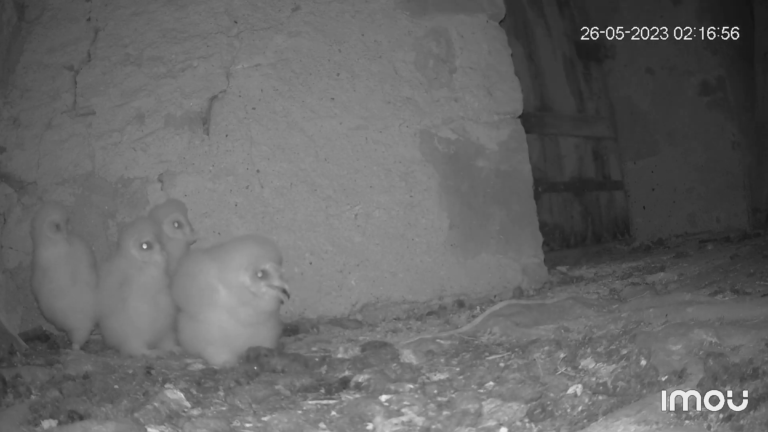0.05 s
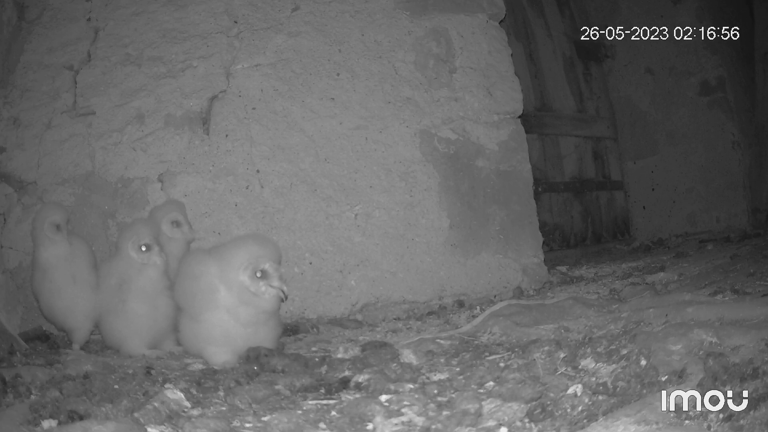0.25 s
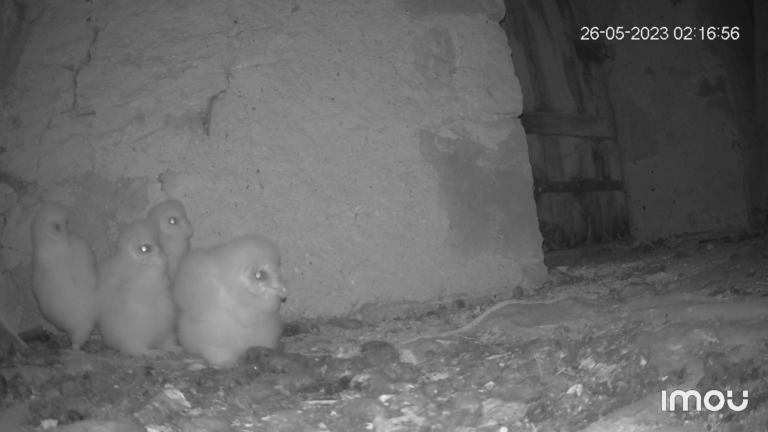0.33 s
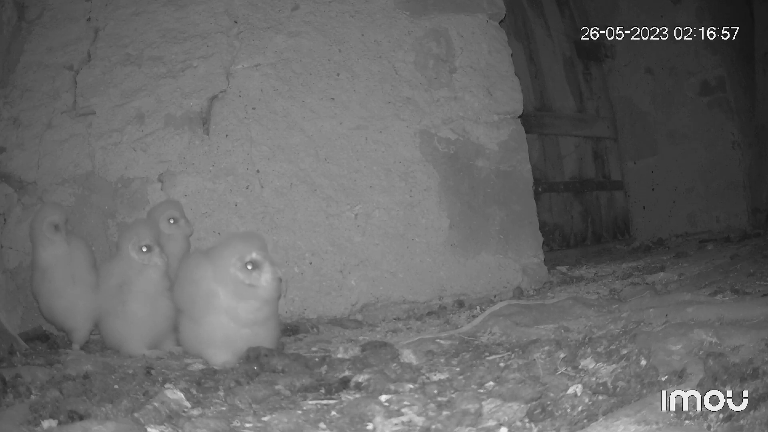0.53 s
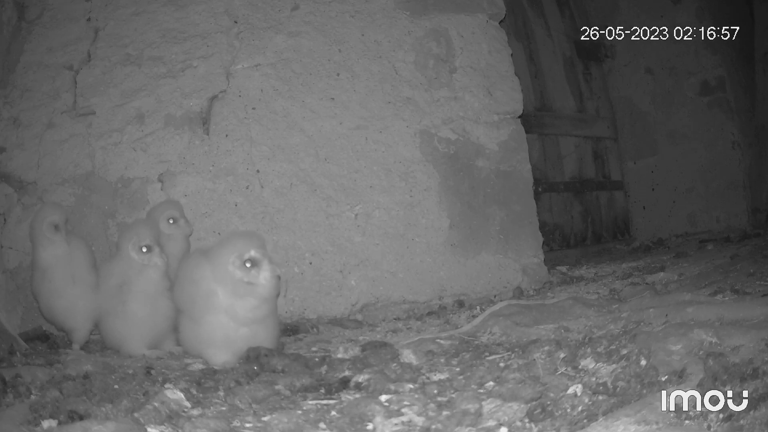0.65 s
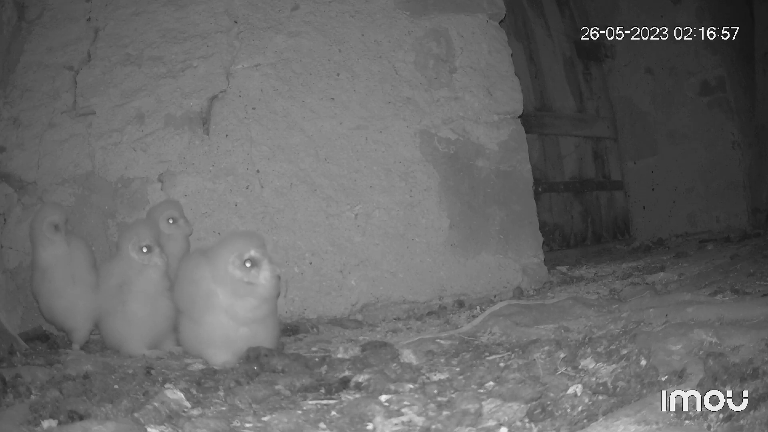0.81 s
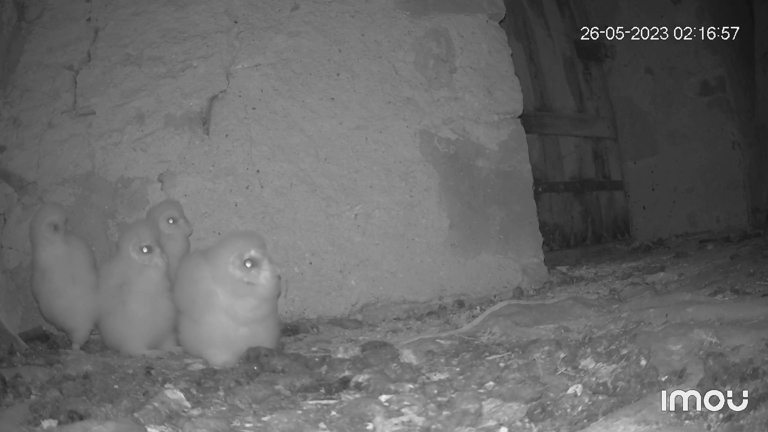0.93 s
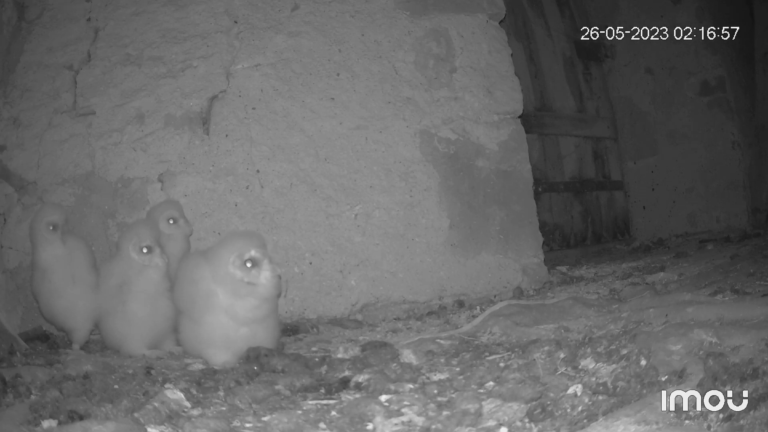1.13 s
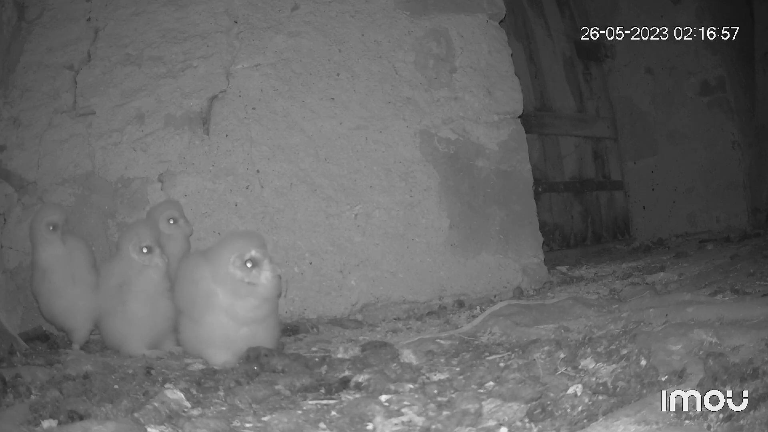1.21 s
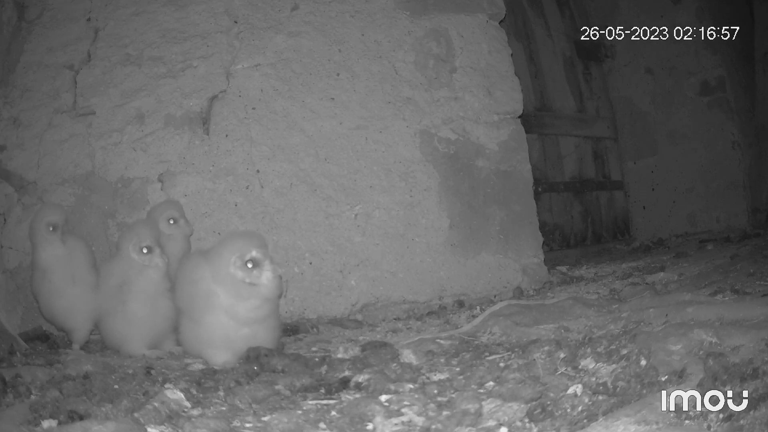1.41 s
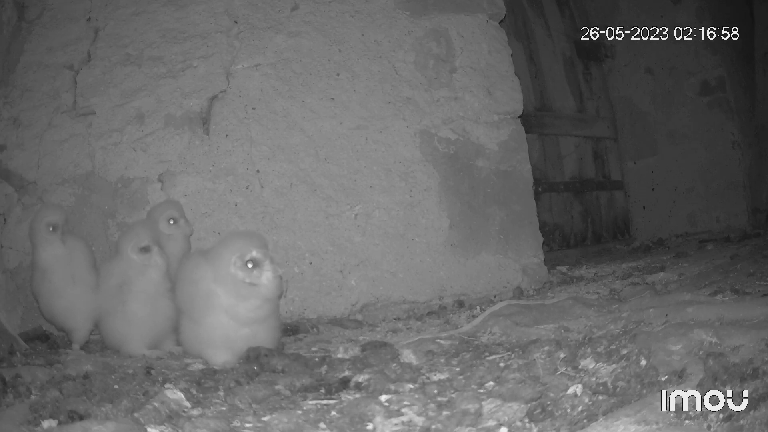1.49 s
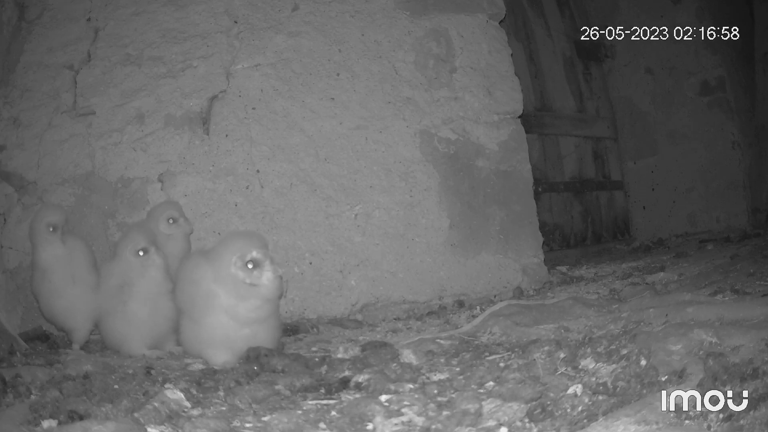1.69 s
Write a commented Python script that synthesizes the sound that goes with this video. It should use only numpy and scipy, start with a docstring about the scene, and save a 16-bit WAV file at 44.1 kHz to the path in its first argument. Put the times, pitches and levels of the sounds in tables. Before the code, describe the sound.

One short, raspy owl chick hiss, then a faint dropping squeak. Deep handling thumps begin during the call, ease off, and return more softly later, with barely audible nest rustles and very quiet air.

```python
"""Owl chick hissing in a stone nest chamber

A barn owl chick gives one harsh, rasping hiss, then a tiny squeak that falls in pitch.
The hiss is noise in narrow resonances of bird and chamber, which glide and dull as the beak closes.
Handling of the microphone adds two bouts of low, uneven rumble (noise in three bands) and dull bumps (pulses).
Short noise puffs make faint nest rustles; coloured noise makes the very quiet air, louder until the call ends."""
import sys
import numpy as np
from scipy import signal
from scipy.fft import rfft, irfft, next_fast_len
from scipy.io import wavfile
from scipy.ndimage import uniform_filter1d, map_coordinates

SR = 44100
rng = np.random.default_rng(int(sys.argv[2]) if len(sys.argv) > 2 else 0)


def log_audio(samples):
    """Write samples as a 16-bit WAV file to the path given in sys.argv[1]."""
    # one column per channel
    frames = np.atleast_2d(samples).T
    # limit to full scale, then quantise
    limited = np.clip(frames, -1, 1)
    pcm = np.round(limited * 32767).astype(np.int16)
    wavfile.write(sys.argv[1], SR, pcm)


N = 77175  # 1.75 s


def amp(db):
    """Decibels to gain."""
    return 10 ** (np.asarray(db) / 20)


def unit(x):
    """Scale to rms 1."""
    return x / np.sqrt(np.mean(x ** 2) + 1e-20)


def curve(rows):
    """Second column of a table against its first (s), one value per sample; the ends are held."""
    times, values = np.transpose(rows)
    return np.interp(np.arange(N) / SR, times, values)


def faded_curve(rows, outside):
    """Like curve, but with the value outside before the first row and after the last."""
    times, values = np.transpose(rows)
    return np.interp(np.arange(N) / SR, times, values, left=outside, right=outside)


def wobble(rate):
    """A smooth random curve, rate knots a second."""
    knots = rng.standard_normal(N // 8)
    return map_coordinates(knots, [np.arange(N) * rate / SR], mode="wrap")


def filtered(x, response):
    """x with its spectrum multiplied by a response of frequency in Hz."""
    padded = next_fast_len(N + 8192)
    hz = np.fft.rfftfreq(padded, 1 / SR)
    return irfft(rfft(x, padded) * response(hz), padded)[:N]


def noise(colour):
    """Noise of rms 1 with a (Hz, relative dB) colour, joined up along log frequency."""
    hz, db = np.transpose(colour)
    response = lambda f: amp(np.interp(np.log(f + 1), np.log(hz + 1), db))
    return unit(filtered(rng.standard_normal(N), response))


def smoothed(x, size):
    """Running mean over size samples, taken twice."""
    return uniform_filter1d(uniform_filter1d(x, size), size)


def steadied(x, size):
    """Noise with its chance swells over size samples evened out, to rms near 1."""
    power = smoothed(x ** 2, size)
    return x / np.sqrt(np.abs(power) + 1e-9)


def rounded(db, size):
    """Gain of a level curve with its corners rounded over size samples."""
    return amp(smoothed(db, size))


def hiss():
    """Turbulent air through the closing beak, roughened by fast random changes of level."""
    # effort of the breath: time_s, level_db
    effort = [(0.04, -94), (0.07, -71), (0.112, -57), (0.132, -43.5), (0.186, -37), (0.274, -41),
              (0.338, -37.5), (0.456, -46.5), (0.486, -57), (0.53, -100)]
    # shape of the beak: time_s, closing (0 open, 1 half closed, 2 closing)
    beak = [(.24, 0.11), (.3, 0.8), (.365, 0.82), (.405, 2)]
    rasp_per_s, rasp_db, patchy_db = 550, 1.5, 2
    air = steadied(patchy(throat(curve(beak)), patchy_db), size=700)
    rasp = unit(amp(rasp_db * wobble(rasp_per_s)))
    return air * rasp * amp(faded_curve(effort, outside=-120))


def throat(beak):
    """Resonances that glide and change balance as the beak closes, over a broad rush of air."""
    # bird and chamber: centre_hz, width_hz, glide_hz over the whole closing, then relative level
    # open_db, half_closed_db, closing_db (each before the square root of the width is applied)
    resonances = [(1170, 63, 36, -38, -26, -29), (1380, 75, 59.5, -31, -19, -21.5),
                  (1780, 62, -20, -25.5, -23.5, -26), (2155, 66, 32.5, -10, -16, -12.5),
                  (2555, 42, -1.5, -16.5, -6, -27), (2760, 42, 120.5, -13.5, -20.5, -5.5),
                  (3093, 67, 19.5, -7.5, -4, -5), (3287, 50, 28.5, -5.5, -12.5, 2.5),
                  (3416, 53, 50, -1, 3, 4), (3630, 15, 0.5, -0.5, -0.5, -14),
                  (3943, 62, -59, -0.5, -2, -2.5), (4190, 80, -5.5, -3.5, -7, -12),
                  (4470, 130, 3.5, -12.5, -14, -4.5), (4420, 25, -31, -3.5, -7, -11),
                  (4927, 41, -46.5, -2.5, -4, -12), (5290, 90, -5, -13, -17.5, -18.5),
                  (5442, 35, 70, -3.5, -11.5, -13.5), (5878, 70, -110, -2.5, -6.5, -7.5),
                  (6336, 46, -1, -10, -9.5, -14.5), (6600, 75, -28, -10, -13.5, -21),
                  (6970, 39, 5, -8, -14, -9.5), (7203, 46, -61.5, -9.5, -16, -27.5)]
    # broad rush under the resonances: frequency_hz, relative_db
    rush = [(500, -39.5), (1000, -34), (1900, -32.5), (2750, -29), (3250, -3), (4300, 2), (5100, -3.5),
            (6200, -6.5), (7200, -19.5)]
    rush_db = -12  # relative to the resonances together
    wander_hz, wander_per_s = 32, 25  # unsteady pitch of each resonance
    swell_db, swell_per_s = 2.5, 36  # each resonance comes and goes
    ringing = np.zeros(N)
    for hz, width, glide, *dbs in resonances:
        centre = hz + glide * beak / 2 + wander_hz * wobble(wander_per_s)
        swell = swell_db * wobble(swell_per_s)
        gain = amp(np.interp(beak, range(3), dbs) + swell)
        ringing += resonance(centre, width) * np.sqrt(width) * gain
    return unit(unit(ringing) + amp(rush_db) * noise(rush))


def resonance(hz, width):
    """Air in one resonance: a narrow band of noise whose centre follows the curve hz."""
    skirt = 2.1  # steepness of the flanks
    response = lambda f: (1 + ((f - hz[0]) / width) ** 2 / skirt) ** -skirt
    band = steadied(filtered(rng.standard_normal(N), response), size=1100)
    # the band starts at hz[0]; turning its analytic signal shifts it along the curve
    turn = 2 * np.pi * np.cumsum(hz - hz[0]) / SR
    return np.real(signal.hilbert(band) * np.exp(1j * turn))


def patchy(x, db):
    """Turbulence: the level swells at random in patches of time and frequency."""
    spectra = signal.stft(x, nperseg=512)[2]
    field = rng.standard_normal(spectra.shape)
    for axis in (0, 1):
        field = uniform_filter1d(field, size=3, axis=axis)
    return signal.istft(spectra * amp(db * unit(field)), nperseg=512)[1][:N]


def squeak():
    """Short, overlapping tone blips with jittered pitch, stepping down as the hiss stops."""
    # blips: start_s, pitch_hz, gain_db, rise_scale_s (the peak comes 1.38 scales after the start)
    blips = [(0.495, 1810, -78, 0.013), (0.5187, 1366, -58, 0.0049), (0.529, 1151, -54, 0.0044)]
    jitter, jitter_per_s = 0.035, 900  # jitter as a fraction of the pitch
    octave_db = -32  # overtone relative to the fundamental
    out = np.zeros(N)
    for start, hz, db, rise in blips:
        u = np.maximum(np.arange(N) / SR - start, 0) / rise
        phase = 2 * np.pi * np.cumsum(hz * (1 + jitter * wobble(jitter_per_s))) / SR
        envelope = u ** 2 * np.exp(2 - 1.45 * u)
        tone = np.sin(phase) + amp(octave_db) * np.sin(2 * phase)
        out += amp(db) * envelope * tone
    return out


def rumble():
    """Handling pressure on the microphone: three low noise bands; the deep and upper bands each have their own
    uneven level, and the middle band's level lies between theirs."""
    # deep band, before its trim: time_s, level_db
    deep_level = [(0, -35), (.015, -47), (.06, -69), (.12, -52.5), (.17, -77), (.215, -23.5), (.24, -49),
                  (.262, -26), (.296, -32.5), (.338, -19), (.374, -35.5), (.404, -35), (.45, -21),
                  (.48, -40.5), (.508, -20.5), (.53, -41), (.565, -34.5), (.598, -51), (.64, -40.5),
                  (.715, -40.5), (.75, -64.5), (.785, -45.5), (.815, -64.5), (.85, -47), (.9, -88),
                  (1.0, -81), (1.04, -52), (1.088, -70), (1.122, -33.5), (1.19, -36.5), (1.24, -54.5),
                  (1.275, -29.5), (1.32, -29.5), (1.355, -35.5), (1.38, -48.5), (1.43, -36.5),
                  (1.47, -34.5), (1.515, -31), (1.545, -46.5), (1.572, -29), (1.645, -40), (1.675, -34.5),
                  (1.715, -49.5), (1.75, -62)]
    # upper band, before its trim: time_s, level_db
    upper_level = [(0, -79), (.17, -94), (.21, -58), (.262, -27), (.295, -52), (.33, -27), (.355, -37.5),
                   (.38, -35), (.405, -40), (.446, -31.5), (.476, -64.5), (.5, -49), (.53, -52),
                   (.565, -62), (.605, -67), (.645, -57.5), (.695, -57), (.745, -81), (.86, -83.5),
                   (.92, -89.5), (.97, -78), (1.09, -93.5), (1.12, -62.5), (1.16, -73.5), (1.245, -71.5),
                   (1.262, -42), (1.292, -67), (1.322, -49), (1.355, -64), (1.382, -56.5), (1.43, -66),
                   (1.488, -48), (1.512, -52.5), (1.54, -67.5), (1.568, -48.5), (1.598, -54.5),
                   (1.635, -57.5), (1.67, -79), (1.71, -66), (1.75, -89)]
    # colours of the three bands: frequency_hz, relative_db
    deep_colour = [(15, -15.5), (30, 2.5), (52, 0), (75, -5.5), (100, -15), (140, -27), (250, -62),
                   (600, -91.5)]
    middle_colour = [(50, -17.5), (85, -2.5), (120, 8.5), (170, -11.5), (240, -33.5), (500, -68)]
    upper_colour = [(80, -13.5), (135, 2.5), (175, 6.5), (280, -4), (370, -26.5), (500, -28.5), (900, -45),
                    (2000, -69), (6000, -89.5)]
    deep_trim_db, middle_trim_db, upper_trim_db = -0.5, -4.5, -1
    middle_share = 0.42  # how far the middle follows the upper band rather than the deep one
    deep_db, upper_db = curve(deep_level), curve(upper_level)
    middle_db = deep_db + middle_share * (upper_db - deep_db)
    deep = steadied(noise(deep_colour), size=900) * rounded(deep_db + deep_trim_db, size=300)
    middle = steadied(noise(middle_colour), size=700) * rounded(middle_db + middle_trim_db, size=250)
    upper = steadied(noise(upper_colour), size=500) * rounded(upper_db + upper_trim_db, size=200)
    return deep + middle + upper


def bumps():
    """Each bump is one dull push on the microphone with its rebound, and a faint scuff."""
    # bumps: time_s, thud_peak_db, thud_half_length_s, scuff_gain_db
    knocks = [(0.251, -13.5, 0.0029, -48.5), (.269, -9.5, 0.0041, -67), (0.326, -21, 0.0011, -53),
              (0.348, -17.5, 0.0025, -52), (.403, -14, 0.0043, -60.5), (.420, -18, 0.0015, -54.5),
              (.444, -25.5, 0.001, -59.5), (.500, -22, 0.002, -52.5), (.563, -23.5, 0.0034, -72.5),
              (0.644, -30, 0.0029, -83), (1.115, -27.5, 0.0044, -79), (1.269, -21, 0.0049, -58.5),
              (1.315, -19, 0.0057, -60), (1.38, -26.5, 0.0029, -70.5), (1.461, -26, 0.0052, -65),
              (1.489, -22.5, 0.0024, -70), (1.511, -30, 0.0016, -72.5), (1.597, -33.5, .0014, -68.5)]
    # colour of the scuffs: frequency_hz, relative_db
    scuff_colour = [(120, 11), (250, 0.5), (430, 0), (600, -12), (1000, -20), (2000, -28), (6000, -42)]
    t = np.arange(N) / SR
    thuds = np.zeros(N)
    for time, thud_db, half_length, _ in knocks:
        u = (t - time) / half_length
        thuds += amp(thud_db) * (u ** 2 - 1) * np.exp(-u ** 2 / 2)
    scuff_events = [(time, scuff_db) for time, _, _, scuff_db in knocks]
    return thuds + scuffs(scuff_events, scuff_colour, decay_s=0.027)


def scuffs(events, colour, decay_s):
    """Puffs of noise, each with a quick rise and a short decay; events are (start s, gain dB)."""
    t = np.arange(N) / SR
    envelope = np.zeros(N)
    for start, db in events:
        u = np.maximum(t - start, 0) / decay_s
        envelope += amp(db) * 2 * np.sqrt(u) * np.exp(-u)
    return noise(colour) * envelope


def rustles():
    """Faint stirrings in the nest: very short puffs of bright noise."""
    # rustles: start_s, gain_db
    stirrings = [(.55, -78.5), (.72, -79), (0.841, -79), (.95, -74.5), (.972, -82)]
    # their colour: frequency_hz, relative_db
    rustle_colour = [(300, -10), (1000, 4), (3300, 8.5), (4800, 5.5), (7000, -6)]
    return scuffs(stirrings, rustle_colour, decay_s=0.0049)


def background():
    """Faint steady air as coloured noise, with a second layer up to the end of the call."""
    # colour of the steady air: frequency_hz, relative_db
    air_colour = [(180, -32.5), (300, 1), (470, -5), (557, -4), (838, -9), (1950, -12), (3480, -13),
                  (3860, -15.5), (6990, -15), (9090, -42.5), (15400, -120)]
    # level of the second layer: time_s, level_db
    opening_level = [(0, -68.5), (.08, -71.5), (.25, -67), (.45, -77), (.53, -128.5)]
    # colour of the second layer: frequency_hz, relative_db
    opening_colour = [(180, -60.5), (300, -10.5), (482, -4), (1240, -11), (1920, -15.5), (2080, -16),
                      (3480, -12.5), (6990, -21.5), (9090, -53), (15400, -120)]
    steady = amp(-83.5) * noise(air_colour)
    opening = amp(faded_curve(opening_level, outside=-130)) * noise(opening_colour)
    return steady + opening


def scene():
    """Everything at the one microphone."""
    mono = hiss() + squeak() + rumble() + bumps() + rustles() + background()
    return mono[None]


def record(dry):
    """The recorder keeps nothing above its band limit."""
    top_hz, slope_hz = 7330, 120  # middle and width of the cutoff
    response = lambda f: np.clip((top_hz - f) / slope_hz + 0.5, 0, 1)
    return np.array([filtered(x, response) for x in dry])


dry = scene()
out = record(dry)
log_audio(out)
```